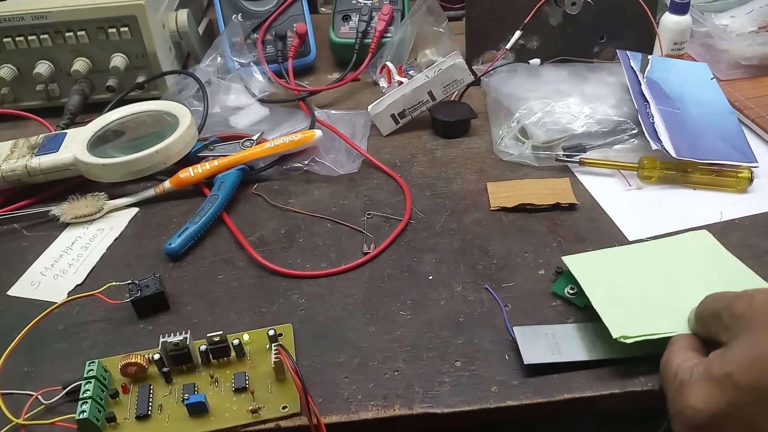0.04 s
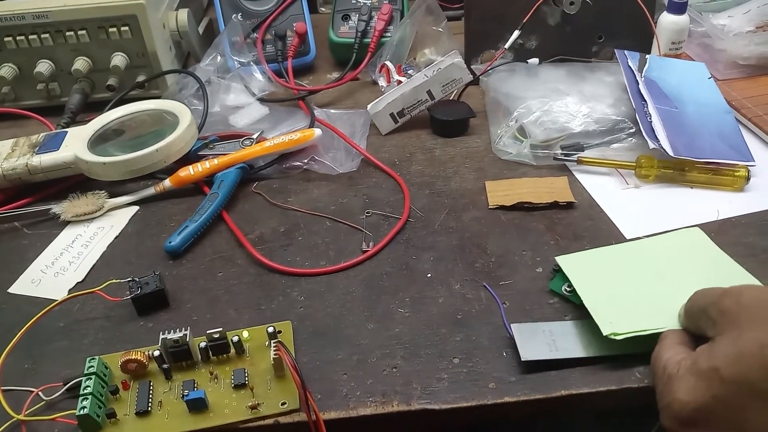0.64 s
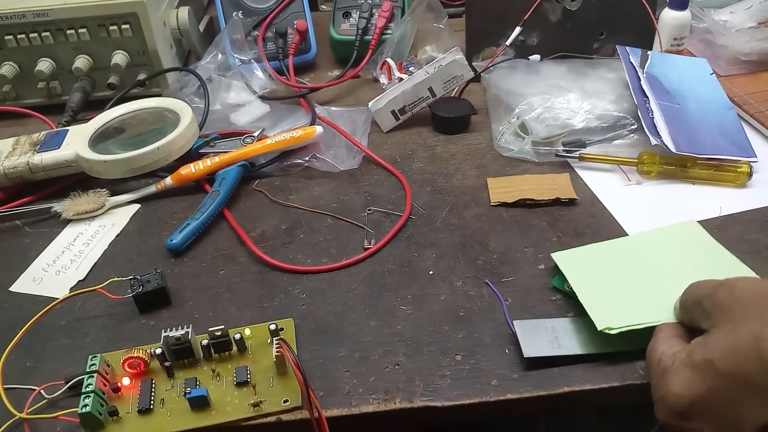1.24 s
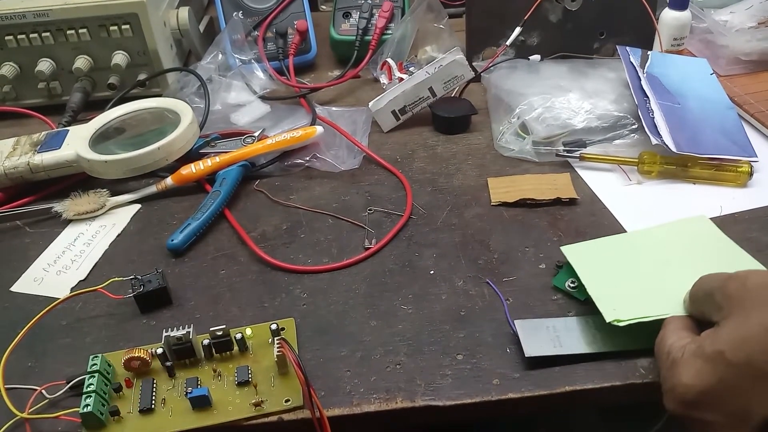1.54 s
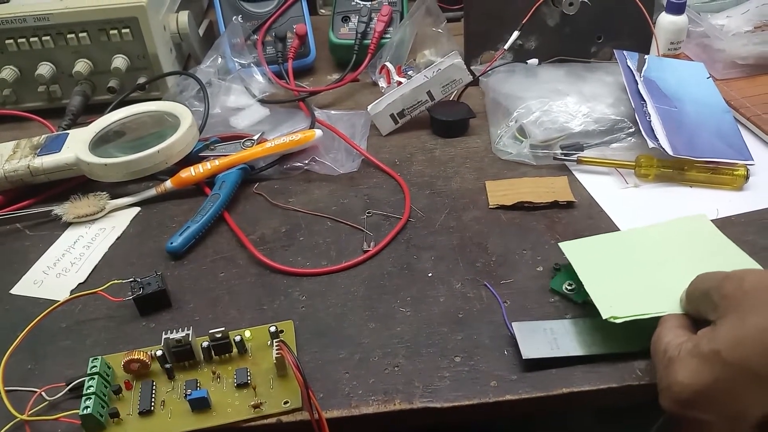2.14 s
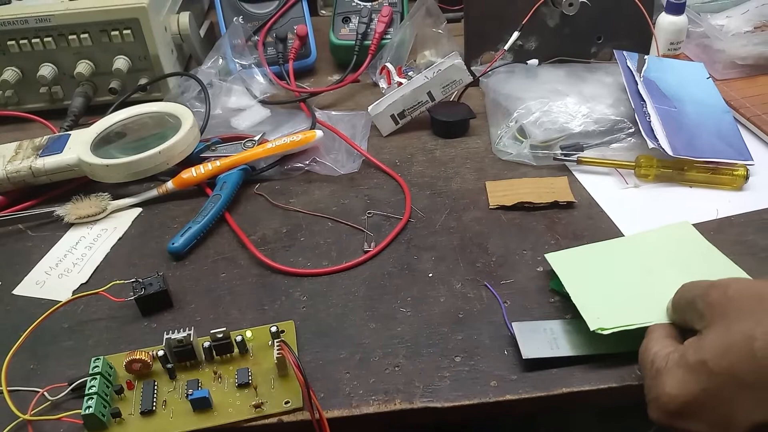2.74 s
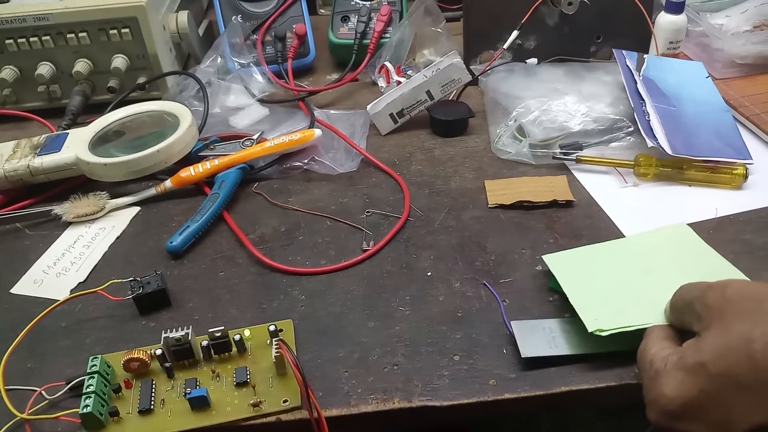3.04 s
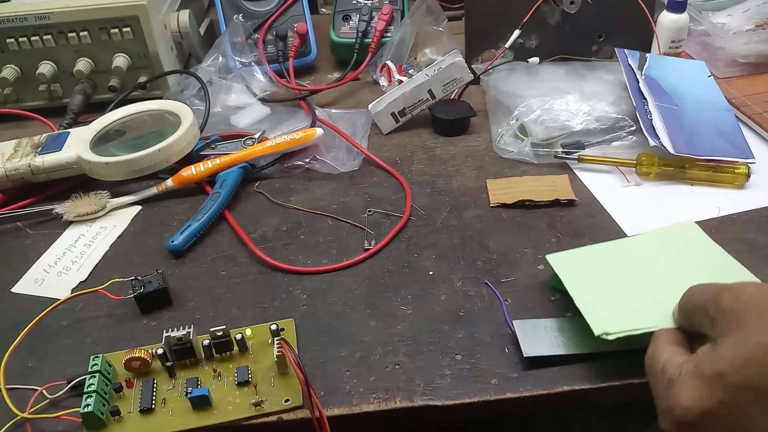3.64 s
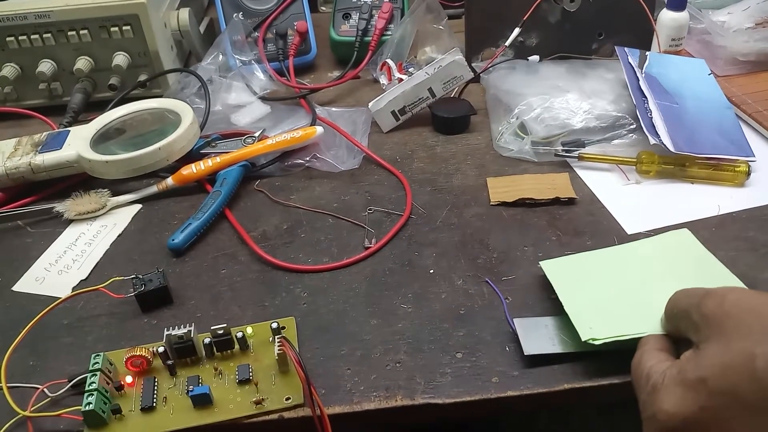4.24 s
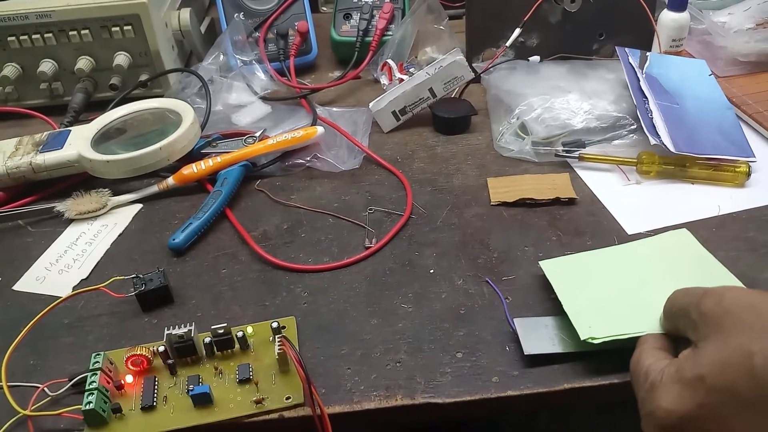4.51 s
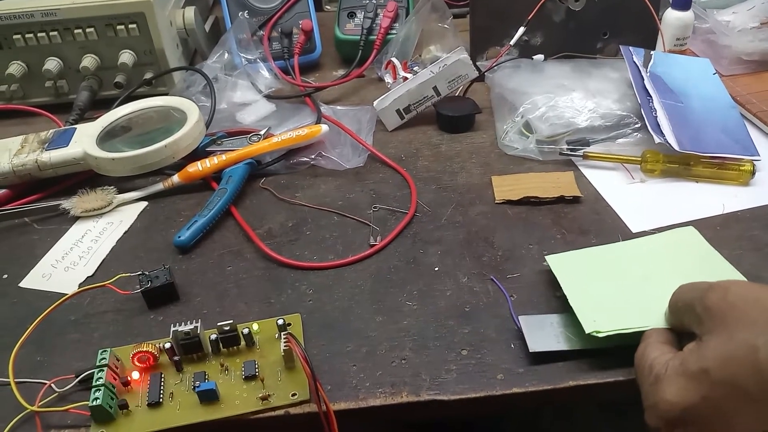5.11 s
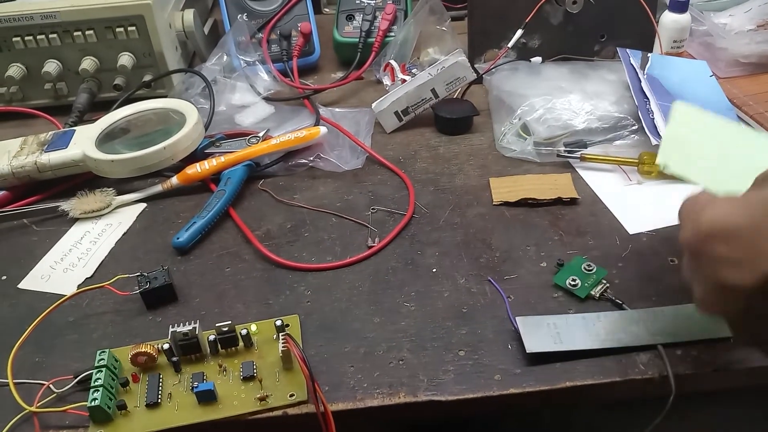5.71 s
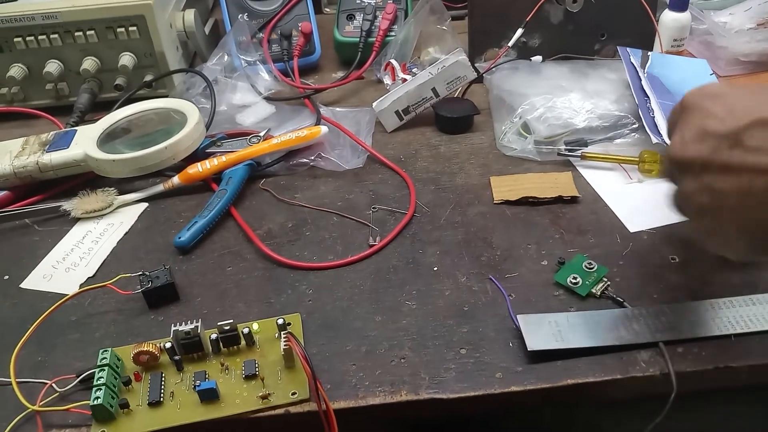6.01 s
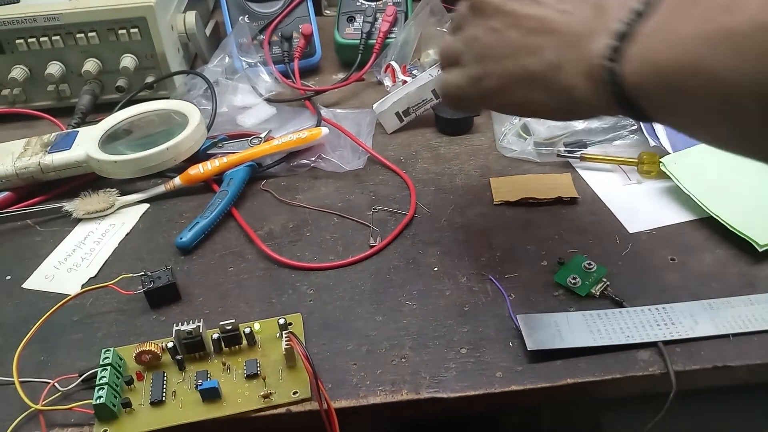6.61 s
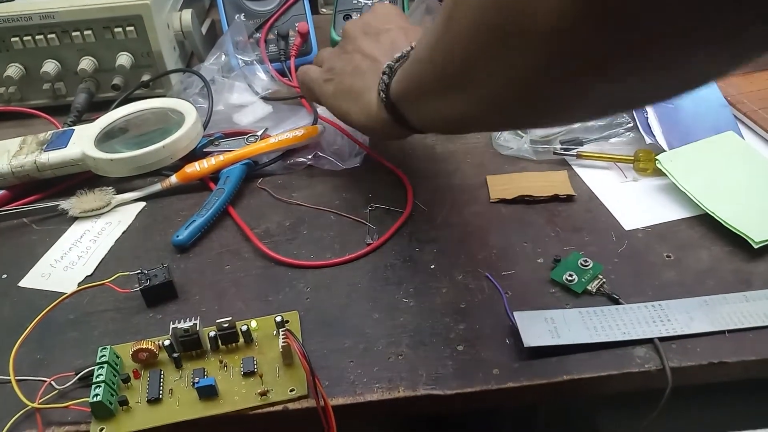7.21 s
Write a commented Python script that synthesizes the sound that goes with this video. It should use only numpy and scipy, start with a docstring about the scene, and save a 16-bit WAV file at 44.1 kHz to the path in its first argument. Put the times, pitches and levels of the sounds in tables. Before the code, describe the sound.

Five pairs of sharp relay clicks sound over a low room hum, then a hand softly taps and rustles paper and plastic.

```python
"""A quiet, hard-walled room: rumble, a low resonance, mains hum, and a far clock ticking each second.
From about 1 s a small relay on a workbench pulls in and drops out five times. The coil pulls in with one
bright steel snap; the spring drops out with a duller triple bounce; both knock the bench top.
One faint tap falls between the cycles. From 5.7 s, with the relay at rest, a hand lays down paper
and rustles among plastic and leads."""
import sys
import numpy as np
from scipy import signal
from scipy.fft import rfft, irfft
from scipy.io import wavfile
from scipy.ndimage import uniform_filter1d

SR = 44100
rng = np.random.default_rng(int(sys.argv[2]) if len(sys.argv) > 2 else 0)


def to_wav(sig):
    """Store sig (one row per channel, or 1-D mono) as 16-bit WAV at the path in sys.argv[1].

    Samples outside -1..1 are clipped; the rate is SR.
    """
    pcm = np.clip(np.atleast_2d(sig), -1, 1) * 32767
    pcm = np.round(pcm).astype(np.int16)
    wavfile.write(sys.argv[1], SR, pcm.T)  # frames by channels


N = 324576
TIME = np.arange(N) / SR
RING = TIME[:SR // 2]  # time axis of an impulse response
IMPULSE = RING == 0

# relay cycles: (pull-in time [s], drop-out time [s], bench knock of the pull-in [dB])
RELAY_CYCLES = [(1.0489, 1.3519, 4), (1.7692, 1.9342, 4), (3.2096, 3.4957, 3), (4.2901, 4.6755, 1),
                (5.0694, 5.3542, 0.5)]
# tone of the taps and rustle, with a dip above 9 kHz: (frequency [Hz], gain [dB])
HANDLING_EQ = [(200, -5), (700, -2), (1100, 6), (1900, -6), (2700, -5), (5000, -4), (8700, -5), (9600, -15),
               (11500, -7), (13500, 0), (16000, -8)]


def amp(db):
    """Decibels to gain."""
    return 10 ** (np.asarray(db) / 20)


def unit_rms(x):
    """Scale a sound to an rms of 1."""
    return x / np.sqrt(np.mean(x ** 2))


def unit_energy(x):
    """Scale a response to an energy of 1."""
    return x / np.sqrt(np.sum(x ** 2))


def along(points, hz):
    """Read a curve of points on a log-frequency axis."""
    point_hz, value = np.transpose(points)
    return np.interp(np.log(hz + 1), np.log(point_hz), value)


def through(x, response):
    """Play a sound through an impulse response."""
    return signal.fftconvolve(x, response)[:len(x)]


def eq(x, curve):
    """Minimum-phase EQ along a curve of (frequency [Hz], gain [dB])."""
    size = 8192
    gain = amp(along(curve, np.fft.rfftfreq(size, 1 / SR)))
    cepstrum = irfft(np.log(gain))
    cepstrum[1:size // 2] *= 2
    cepstrum[size // 2 + 1:] = 0
    return through(x, irfft(np.exp(rfft(cepstrum))))


def blows(times, db, size=N):
    """One impulse for each blow."""
    samples = (np.asarray(times) * SR).astype(int)
    return np.bincount(samples, amp(db) * np.ones(len(times)), size)[:size]


def ring(modes, rise_s):
    """Decaying modes that build up over a short contact; narrow ones ring longest."""
    waves = 0
    for hz, width, db in modes:
        damping = np.pi * width
        height = amp(db) * 2 * damping / SR * (1 + damping * rise_s)
        waves = waves + height * np.exp(-damping * RING) * np.sin(2 * np.pi * hz * RING)
    return waves * (1 - np.exp(-RING / rise_s))


def tick(hz, breadth):
    """A heavily damped tick with steep skirts; breadth is bandwidth over pitch, capped at 1.5."""
    b, a = signal.iirpeak(hz, 1 / min(breadth, 1.5), SR)
    return signal.lfilter(b, a, signal.lfilter(b, a, IMPULSE))


def wander(rate_hz):
    """Slow random drift with an rms of 1."""
    hold = int(SR / rate_hz)
    steps = np.repeat(rng.standard_normal(N // hold + 1), hold)
    return unit_rms(uniform_filter1d(uniform_filter1d(steps, hold), hold)[:N])


def room(gap_s, build_s):
    """Diffuse tail off the hard walls; the treble dies first."""
    # reverb decay: (frequency [Hz], time to fall 60 dB [s])
    decay_times = [(200, 0.38), (1000, 0.27), (4000, 0.28), (8500, 0.26), (11000, 0.23), (15000, 0.23)]
    centres, t60s = np.transpose(decay_times)
    hz = np.fft.rfftfreq(len(RING), 1 / SR)
    noise = rfft(rng.standard_normal(len(RING)))
    tail = 0
    for share, t60 in zip(np.eye(len(centres)), t60s):
        band = irfft(noise * along(np.c_[centres, share], hz), len(RING))
        tail = tail + band * amp(-60 * RING / t60)
    swell = 1 - np.exp(-np.maximum(RING - gap_s, 0) / build_s)
    return unit_energy(tail * swell)


def room_tone(air_db=-67):
    """Rumble with faint hiss, a wavering low resonance near 69 Hz and mains hum near 100 Hz."""
    # tone of the room's air: (frequency [Hz], relative level [dB])
    air_eq = [(12, -46.5), (20, -18), (37, -13), (60, -5.5), (101, -1), (123, -6.5), (216, -18),
              (485, -24.5), (527, -26), (698, -26.5), (897, -30.5), (3840, -33.5), (9950, -40),
              (14700, -35.5), (16000, -40)]
    # low resonance, then mains hum: (frequency [Hz], level [dB], waver depth [ratio])
    low_tones = [(69, -77, 0.76), (98.3, -72.5, 0.19)]
    air = amp(air_db) * unit_rms(eq(rng.standard_normal(N), air_eq))
    drone = 0
    for hz, db, waver in low_tones:
        flutter = 1 + waver * wander(rate_hz=9)
        phase = 2 * np.pi * hz * TIME + 2 * waver * wander(rate_hz=2.6)
        drone = drone + amp(db) * unit_rms(flutter * np.sin(phase))
    return air + drone


def wall_clock(first_s=0.345, period_s=1, count=7, gain_db=-4.5):
    """The distant movement steps and settles; only the room's echo arrives."""
    # one step, from winding up to settling: (offset from the beat [s], relative level [dB])
    step_parts = [(-.032, -12), (-.008, -1), (.002, 3), (0.018, -9.5), (0.035, -12), (.088, -13)]
    # tone of the far tick: (frequency [Hz], gain [dB])
    clock_eq = [(400, -35.5), (850, -25), (1100, -16.5), (1230, -11.5), (1400, -16), (1800, -20.5),
                (2300, -29.5), (3600, -34), (6000, -42), (12000, -64.5)]
    beats = first_s + period_s * np.arange(count)
    steps = sum(blows(beats + offset, gain_db + db) for offset, db in step_parts)
    return eq(through(steps, room(gap_s=0.001, build_s=0.025)), clock_eq)


def finger_squeaks(room_db=-3):
    """A finger drags on plastic: a narrow rasp that swells and lets go."""
    # finger slips: (start [s], length [s], level [dB], pitch [Hz], breadth [ratio])
    slips = [(7.079, 0.058, -56.5, 3930, 0.22), (7.266, 0.0092, -54.5, 6200, 0.2),
             (7.284, 0.014, -51, 5800, 0.37)]
    out = 0
    for start, length, db, hz, breadth in slips:
        drag = np.sin(np.pi * np.clip((TIME - start) / length, 0, 1) ** 2)
        rasp = unit_rms(through(rng.standard_normal(N), tick(hz, breadth)))
        out = out + amp(db) * drag * rasp
    return through(out, IMPULSE + amp(room_db) * room(gap_s=0.002, build_s=0.0022))


def hand_rustle(grains_per_s=900, spread_db=4, direct_db=-4, crackle_db=-6.5):
    """Each stroke sets off dense tiny slips of uneven size, as strong as the hand presses."""
    # strokes over paper, plastic and leads: (start [s], length [s], level [dB], pitch [Hz])
    strokes = [(5.706, 0.058, -72, 4000), (6.443, 0.04, -68.5, 4400), (6.574, 0.036, -63, 3200),
               (7.086, 0.1, -51.5, 5400), (7.261, 0.028, -53, 5430)]
    attack_s, release_s = 0.023, 0.012
    sizes = rng.choice([-1, 1], N) * amp(spread_db * np.minimum(rng.exponential(size=N), 2))
    slips = unit_rms((rng.random(N) < grains_per_s / SR) * sizes)
    out = 0
    for start, length, db, hz in strokes:
        attack = np.clip((TIME - start) / attack_s, 0, 1) ** 2
        release = np.exp(-np.maximum(TIME - start - length, 0) / release_s)
        grain = unit_energy(tick(hz, breadth=1.5) + amp(crackle_db) * IMPULSE)
        out = out + amp(db) * through(slips * attack * release, grain)
    path = amp(direct_db) * IMPULSE + room(gap_s=0.0012, build_s=0.0019)
    return eq(through(out, path), HANDLING_EQ)


def paper_taps(crumple_s=0.0022, crumple_db=1.5):
    """Paper and fingers touch down at the back of the bench; the sheet gives with a tiny crumple."""
    # light touches: (time [s], level [dB], pitch [Hz], breadth [ratio], direct over reverb [dB])
    touches = [(3.755, -29.5, 940, 1.4, 2), (6.0855, -23.5, 1840, 1.9, -6.5),
               (6.1137, -20, 2930, 1.8, -3.5), (6.5992, -19.5, 3080, 0.76, -0.5),
               (6.745, -7.5, 3420, 2, -11), (7.17, -17.5, 2720, 0.95, 2.5), (7.1869, -15.5, 3100, 1.1, 6)]
    tail = room(gap_s=0.00057, build_s=0.0085)
    out = 0
    for time, db, hz, breadth, direct_db in touches:
        crumple = rng.standard_normal(len(RING)) * np.exp(-RING / crumple_s)
        touch = unit_energy(IMPULSE + amp(crumple_db) * unit_energy(crumple))
        tap = through(tick(hz, breadth), amp(direct_db) * touch + tail)
        out = out + through(blows([time], [db]), tap)
    return eq(out, HANDLING_EQ)


def relay_snaps(times, snap, gain_db, room_db, echo_db, spring_db):
    """The armature lands equally hard every time; its snap fills the room and the spring rings on."""
    # slaps off near surfaces: (delay [s], relative level [dB])
    echoes = [(.0046, -12.5), (.0081, -18.5), (0.0113, -23.5), (0.0161, -28), (.0195, -16.5),
              (0.049, -18.5)]
    # tone of the snap's reverb: (frequency [Hz], gain [dB])
    reverb_eq = [(200, -5), (4000, -3), (5700, -3.5), (8500, -2.5), (11000, 3.5), (14000, -7), (16000, -3)]
    # return spring: (frequency [Hz], bandwidth [Hz], level [dB])
    spring_modes = [(7960, 9, 15.5), (8280, 10, 21), (9010, 10, 21), (8800, 7.1, 15), (8500, 10, 15),
                    (8830, 13, 13.5), (8600, 11, 6.5)]
    delays, surface_db = np.transpose(echoes)
    early = blows(delays, surface_db + echo_db, size=len(RING))
    tail = amp(room_db) * eq(room(gap_s=0.0014, build_s=0.001), reverb_eq)
    spring = amp(spring_db) * ring(spring_modes, rise_s=0.0055)
    return through(blows(times, gain_db), through(snap, IMPULSE + early + tail) + spring)


def bench_knocks(times, knock_eq, gain_db, ring_db):
    """The bench top rings under each blow and spreads the knock into the room."""
    # bench top and the things lying on it: (frequency [Hz], bandwidth [Hz], level [dB])
    bench_modes = [(686, 12, 2), (866, 19, 2.5), (969, 19, 4.5), (1240, 13, -1.5), (1725, 15, 5.5),
                   (1772, 11, 7.5), (1975, 19, 4), (2336, 18, 12)]
    wood = amp(ring_db) * ring(bench_modes, rise_s=0.0066)
    tail = room(gap_s=0.00099, build_s=0.0019)
    return through(blows(times, gain_db), eq(wood + tail, knock_eq))


def relay_drop_out(crack_db=-12):
    """The spring throws the contact back, where it bounces before it rests."""
    # blows of the contact on its rest, the first dullest: (delay [s], level [dB], tilt [dB/octave])
    bounces = [(0, -3, -5), (.0019, 1.5, 6.5), (.0033, -0.5, 0.5)]
    # contact spring and plastic case: (frequency [Hz], bandwidth [Hz], level [dB])
    case_modes = [(3530, 63, -2.5), (3888, 250, -8), (4147, 443, -1.5), (4406, 230, 1.5), (4632, 97, -1),
                  (6070, 430, -3.5), (7500, 180, -0.5), (8180, 210, -3.5), (8810, 300, 4.5),
                  (9200, 370, -24), (10230, 310, -0.5), (11200, 170, -12.5), (12120, 190, -6),
                  (14400, 430, -20), (14800, 1200, -23)]
    # tone of the bench knock: (frequency [Hz], gain [dB])
    knock_eq = [(100, -20), (300, -21.5), (690, -17.5), (830, -1), (1300, -8), (1550, -10), (1800, -3.5),
                (2300, -9), (3000, -15), (3700, -12.5), (5500, -10.5), (9000, -18.5), (13000, -12),
                (16000, -21.5)]
    hz, width, db = np.transpose(case_modes)
    crack = amp(crack_db) * tick(1960, breadth=0.16)
    snap = 0
    for delay, blow_db, tilt in bounces:
        tilted_modes = np.c_[hz, width, db + tilt * np.log2(hz / np.median(hz))]
        blow = ring(tilted_modes, rise_s=0.0007) + crack
        snap = snap + through(blow, blows([delay], [blow_db], size=len(RING)))
    _, times, _ = np.transpose(RELAY_CYCLES)
    snaps = relay_snaps(times, snap, gain_db=-0.06, room_db=-6.5, echo_db=3.5, spring_db=-7.5)
    return snaps + bench_knocks(times, knock_eq, gain_db=3.5, ring_db=3)


def relay_pull_in(steel_db=2.5, crack_db=-18):
    """The coil slams the armature on its core: a single bright blow."""
    # steel armature on the core: (frequency [Hz], bandwidth [Hz], level [dB])
    core_modes = [(5427, 450, -8.5), (5604, 310, 9), (5800, 280, 8), (7700, 260, -10.5), (8140, 280, 10.5),
                  (8610, 240, 9.5), (8710, 300, 14.5), (8670, 430, 15), (9000, 210, 4.5), (10930, 360, 5.5),
                  (11120, 320, 1.5), (12060, 150, -2), (13830, 530, 6), (14750, 730, -0.5),
                  (15500, 800, -14)]
    # tone of the bench knock: (frequency [Hz], gain [dB])
    knock_eq = [(100, -17.5), (520, -26), (680, -13.5), (820, -18.5), (980, -6.5), (1200, -20.5),
                (1550, -15), (1750, -7.5), (2300, -14), (2900, -16.5), (4200, -16.5), (6500, -9),
                (10000, -20.5), (16000, -15.5)]
    crack = amp(crack_db) * tick(5000, breadth=1.2)
    snap = amp(steel_db) * ring(core_modes, rise_s=0.0015) + crack
    times, _, knock_db = np.transpose(RELAY_CYCLES)
    snaps = relay_snaps(times, snap, gain_db=-4.5, room_db=-2, echo_db=-8.5, spring_db=5)
    return snaps + bench_knocks(times, knock_eq, gain_db=knock_db, ring_db=1)


def scene():
    """Relay, handling, clock and room tone, mixed in mono."""
    relay = relay_pull_in() + relay_drop_out()
    handling = paper_taps() + hand_rustle() + finger_squeaks()
    return (relay + handling + wall_clock() + room_tone())[None]


def record(dry):
    """The phone cuts the top of the treble."""
    cutoff_hz = 15900
    return signal.sosfilt(signal.ellip(8, 0.2, 70, cutoff_hz, fs=SR, output="sos"), dry)


dry = scene()
out = record(dry)
to_wav(out)
```